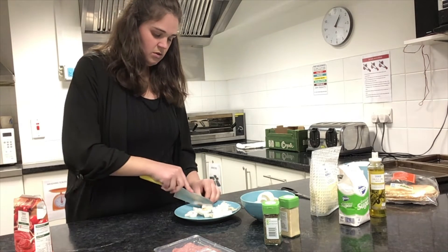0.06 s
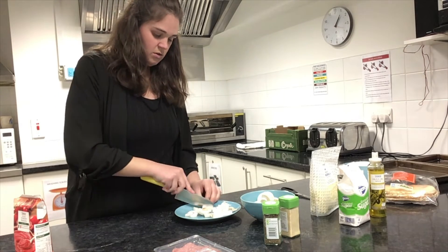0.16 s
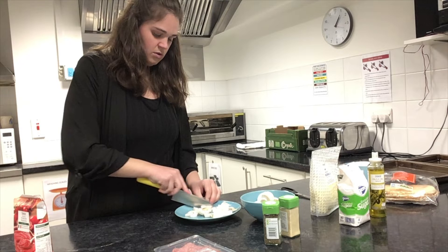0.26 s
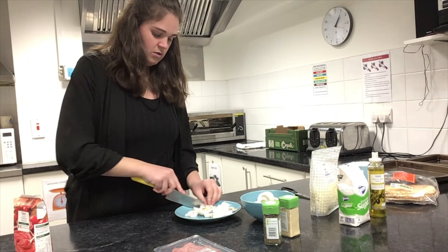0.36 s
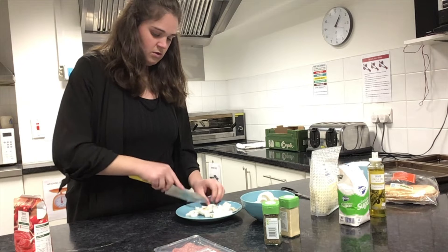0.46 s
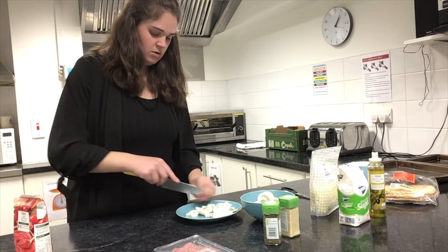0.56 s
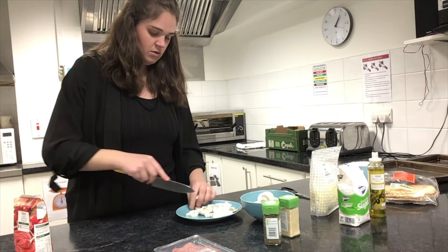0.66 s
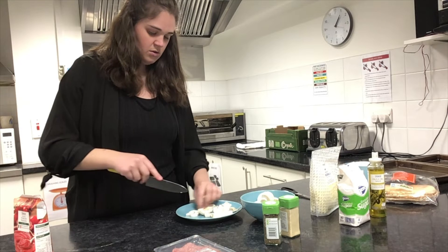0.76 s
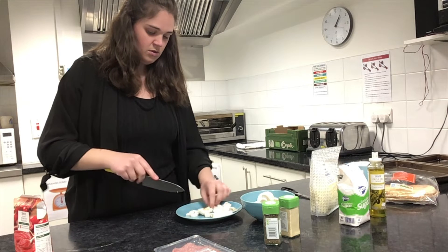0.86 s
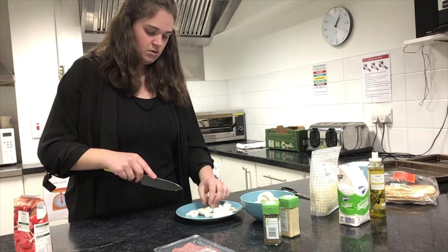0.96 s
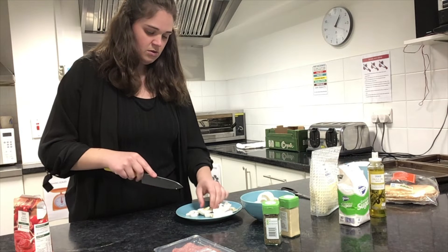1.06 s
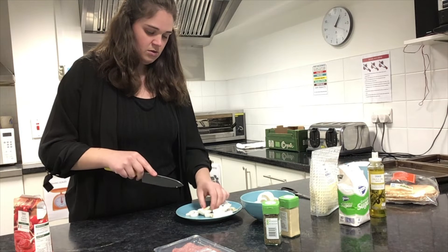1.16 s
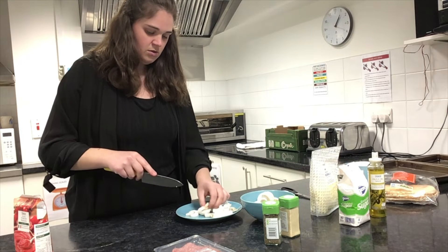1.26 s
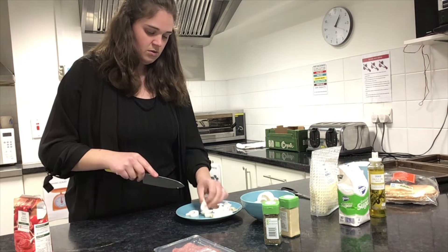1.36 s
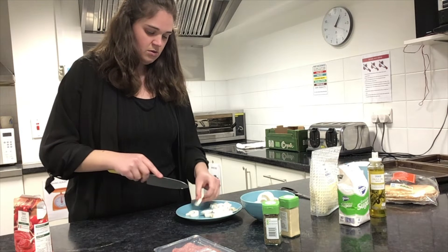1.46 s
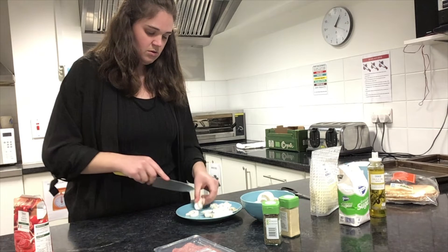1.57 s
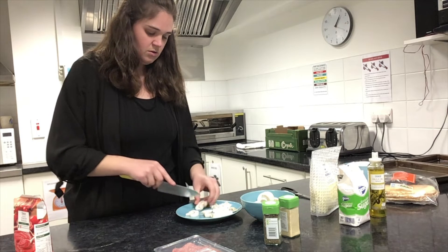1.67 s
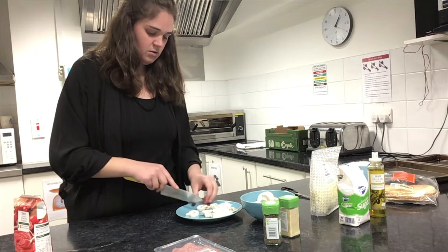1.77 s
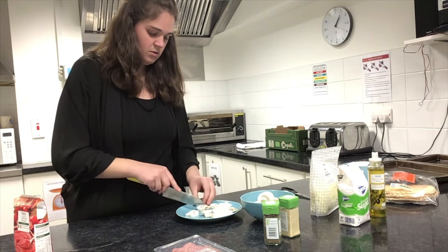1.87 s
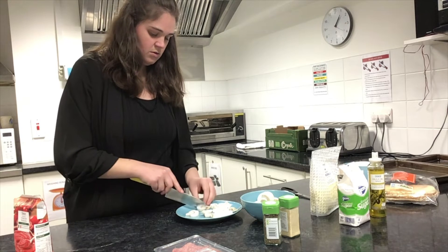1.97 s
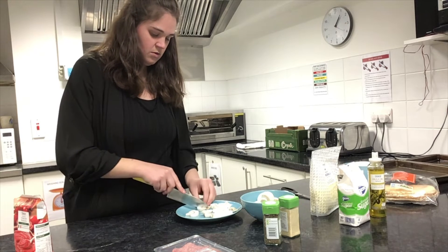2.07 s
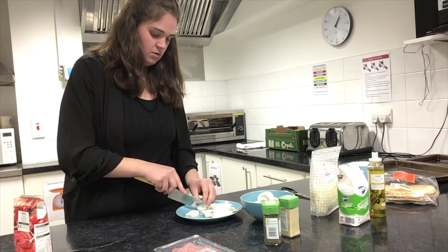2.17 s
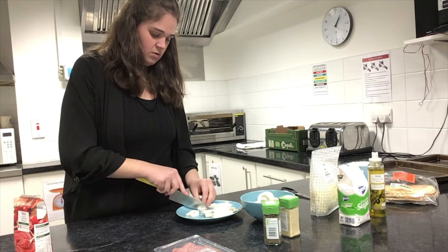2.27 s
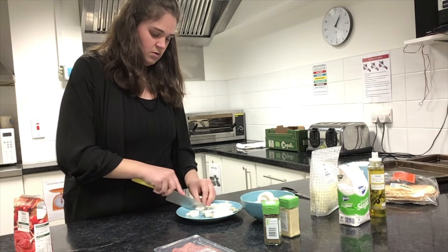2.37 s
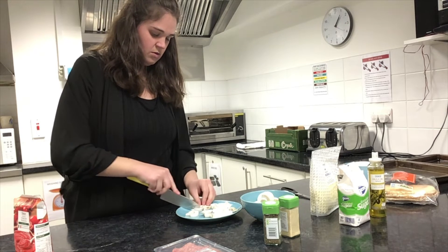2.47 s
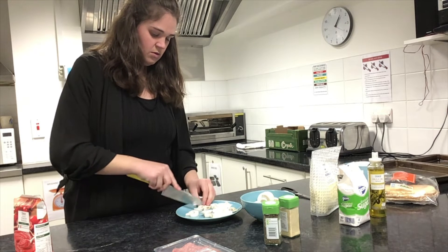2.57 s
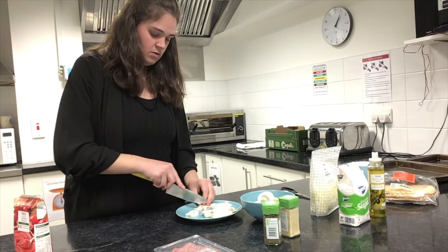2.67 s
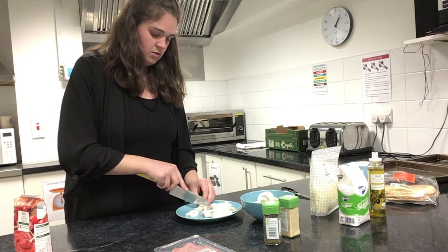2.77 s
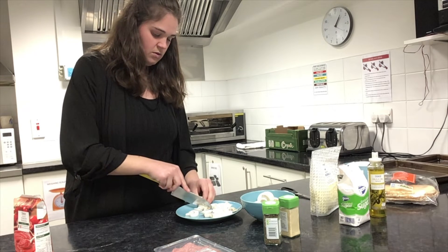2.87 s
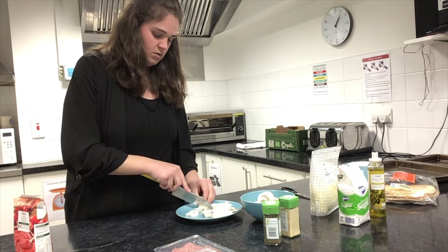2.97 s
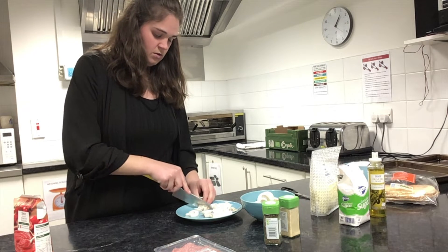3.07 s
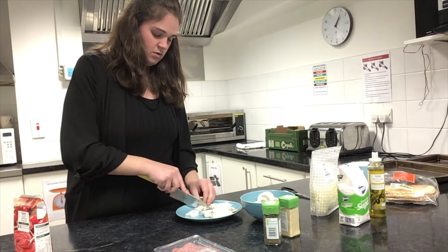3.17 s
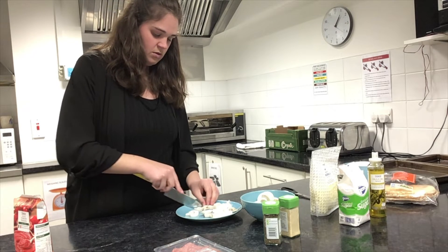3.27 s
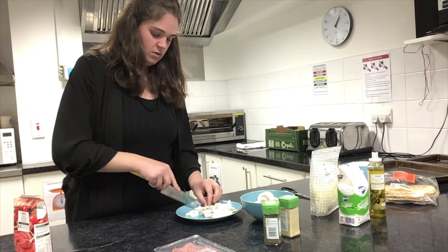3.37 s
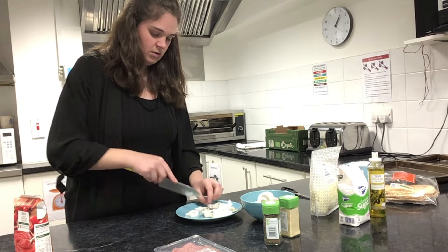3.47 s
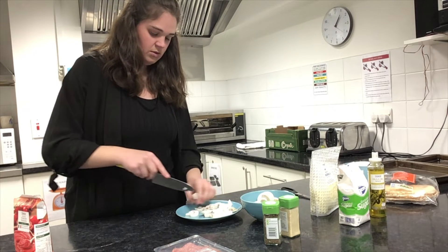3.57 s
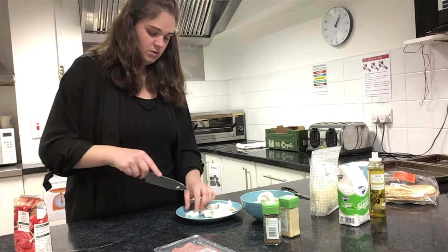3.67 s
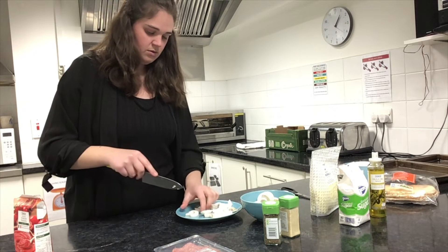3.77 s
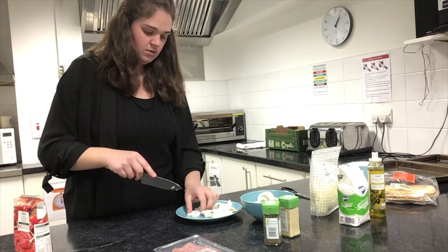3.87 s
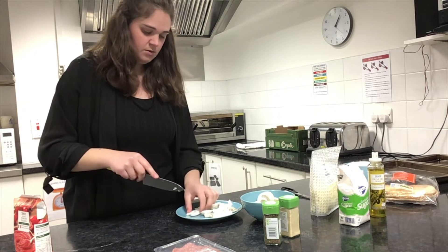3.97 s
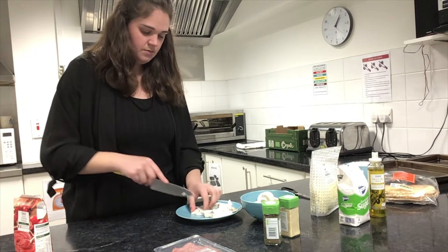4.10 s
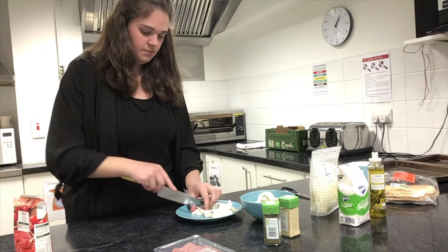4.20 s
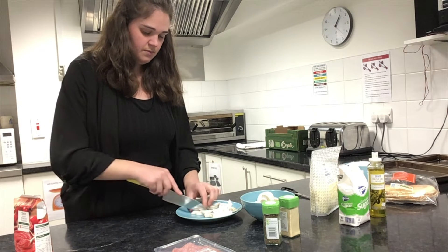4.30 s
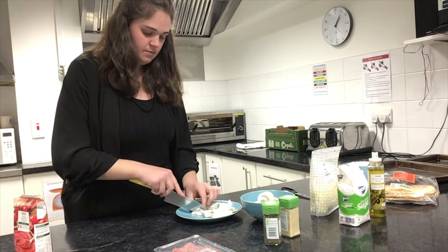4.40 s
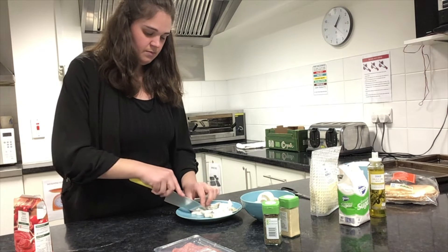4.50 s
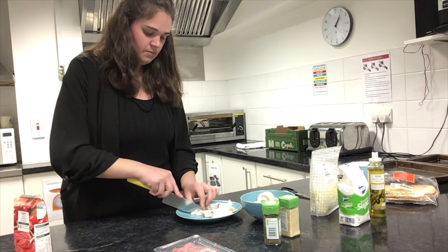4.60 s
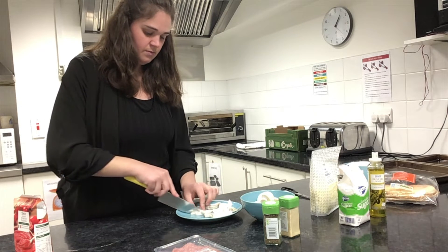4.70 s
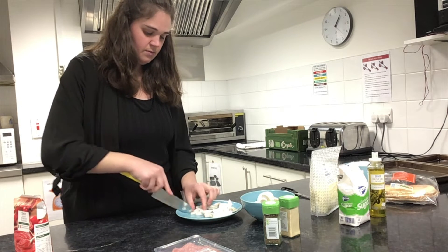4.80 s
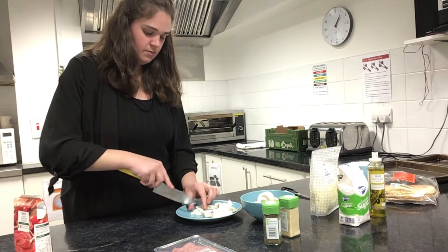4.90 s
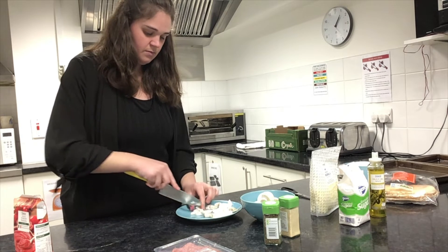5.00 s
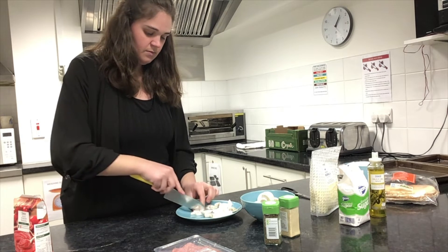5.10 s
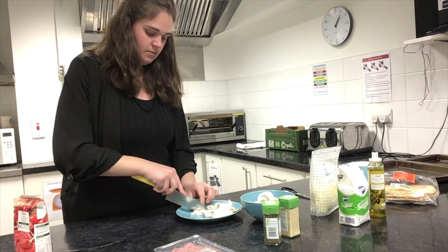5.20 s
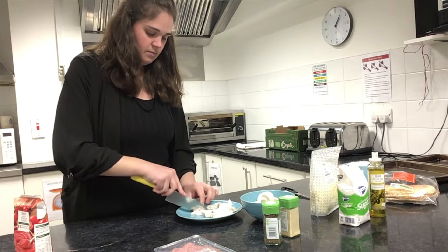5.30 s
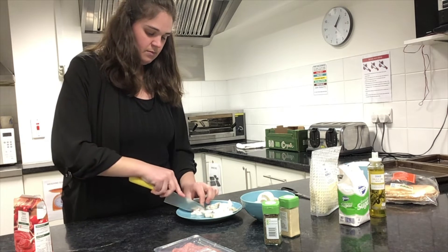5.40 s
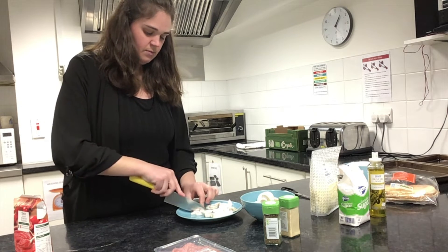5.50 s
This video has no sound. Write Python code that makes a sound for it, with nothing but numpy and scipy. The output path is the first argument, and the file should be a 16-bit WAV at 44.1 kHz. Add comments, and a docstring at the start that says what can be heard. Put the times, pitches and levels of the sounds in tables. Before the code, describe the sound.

A knife slices soft mushrooms and clacks sharply onto a ceramic plate five times, unevenly spaced, in a tiled kitchen with faint hum.

```python
"""A knife cuts through soft mushrooms and lands on a glazed plate on a stone counter, heard close, in mono.
Each landing is a chattering burst that rings damped plate modes, led in by a swelling hiss of noise.
The plate's foot knocks back, soft bursts rustle, the counter booms, and a tiled kitchen answers in taps.
A light brush rings faintly and wet flesh squeaks twice on the glaze, as a gliding harmonic stack.
Under it lie room air and microphone hiss as coloured noise, a low hum and wavering fridge tones."""
import sys
import numpy as np
from scipy import signal
from scipy.fft import rfft, irfft
from scipy.io import wavfile
from scipy.ndimage import uniform_filter1d

SR = 44100
rng = np.random.default_rng(int(sys.argv[2]) if len(sys.argv) > 2 else 0)


def to_wav(s):
    """Save 16-bit WAV."""
    ch = np.atleast_2d(s).T  # columns
    pcm = np.round(np.clip(ch, -1, 1) * 32767)  # PCM
    wavfile.write(sys.argv[1], SR, pcm.astype(np.int16))


def gain_from_db(level_db):
    """Turn a decibel level (scalar or array-like) into a linear amplitude factor."""
    decades = np.asarray(level_db, float) / 20
    return 10 ** decades


N = 244622

# modes of the plate: mode_hz, under_blade_db, in_knock_db, longest t60_s
PLATE = [(369, -20, -10.5, 0.1), (419, -13, -10.5, 0.11), (473.4, -9.5, -7, 0.079),
         (535, -14.5, -6.5, 0.031), (930, -12, -7, .025), (1010, -9, -4, .025), (1350, -10, -4, .025),
         (1679, -10.5, -10, 0.3), (1833, 1, -5, 0.032), (1992, -1, -4.5, 0.058), (2136, -1.5, -12.5, 0.037),
         (2453, -8.5, -23, 0.14), (2575, -12.5, -8.5, 0.57), (2784, -21.5, -7.5, 0.033),
         (3120, -15.5, -4, .1), (3287, 5, -10.5, 0.023), (3605, -10.5, -6.5, 0.15), (3900, -5, -4.5, 0.061),
         (4055, 0.5, -13.5, 0.031), (4300, -3.5, -20.5, 0.056), (4600, -17, -16, 0.39),
         (4850, -21.5, -6.5, 0.11), (4940, -20, -14, 0.055), (6044, -2, -15, 0.058), (6244, 0, -10, 0.084),
         (6600, -16, -13.5, 0.04), (7720, -11, -17, 0.13), (8540, -11, -27, 0.16), (9210, -18, -20.5, 0.2),
         (11080, -11.5, -31, 0.16), (12790, -27.5, -51, 0.1), (14200, -15, -30, 0.073)]


def evened(x):
    """Scales to rms 1."""
    return x / np.sqrt(np.mean(x ** 2) + 1e-20)


def read(points, hz):
    """Reads a table on a log-frequency axis."""
    f, value = np.transpose(points)
    return np.interp(np.log(hz + 1), np.log(f + 1), value)


def add(mix, s, sound):
    """Mixes a sound in at s seconds."""
    part = mix[round(s * SR):][:len(sound)]
    part += sound[:len(part)]


def noise(size, spectrum):
    """Noise of rms 1 with the given colour."""
    hz = np.fft.rfftfreq(size, 1 / SR)
    coloured = rfft(rng.standard_normal(size)) * gain_from_db(read(spectrum, hz))
    return evened(irfft(coloured, size))


def fuzzy_tone(hz, width):
    """A tone of rms 1 whose height and phase wander at the rate of its width in Hz."""
    r = np.exp(-np.pi * width / SR)
    # a second of run-in is dropped
    wander = signal.lfilter([1], [1, -2 * r, r * r], rng.standard_normal((2, N + SR)))[:, SR:]
    carrier = np.exp(2j * np.pi * hz * np.arange(N) / SR)
    return evened(np.real((wander[0] + 1j * wander[1]) * carrier))


def hold(t, length, edge):
    """Rises, holds and falls with soft edges."""
    return np.sin(np.pi / 2 * np.clip(np.minimum(t, length + edge - t) / edge, 0, 1)) ** 2


def causal_filter(spectrum, log_gain):
    """Applies a log gain to a spectrum with minimum phase, so that nothing sounds early."""
    return np.fft.ifft(spectrum * np.exp(np.conj(signal.hilbert(log_gain)))).real


def uncoloured(taps, smooth_hz):
    """Evens out the broad colour of a train of taps with a causal filter, keeping its timing."""
    spectrum = np.fft.fft(taps, 2 * len(taps))
    bins = round(smooth_hz * len(spectrum) / SR)
    power = uniform_filter1d(abs(spectrum) ** 2, bins, mode="wrap")
    return causal_filter(spectrum, -.5 * np.log(power))[:len(taps)]


def rattle(length, density, first):
    """One first impact, then sparse ones (density per s) that fall 30 dB over length seconds; evened."""
    t = np.arange(3000) / SR
    draw = rng.random((2, len(t)))
    taps = (draw[0] < density / SR) * (2 * draw[1] - 1) * gain_from_db(-30 * t / length)
    taps[0] = first
    return uncoloured(taps, 120)


def snap(size, spectrum, t60):
    """A dying burst of noise, evened out and then given its colour by a causal filter."""
    fall = gain_from_db(-60 * np.arange(size) / SR / t60)
    flat = np.fft.fft(uncoloured(rng.standard_normal(size) * fall, 250), 2 * size)
    log_gain = np.log(gain_from_db(read(spectrum, abs(np.fft.fftfreq(2 * size, 1 / SR)))))
    burst = causal_filter(flat, log_gain)[:size]
    return burst * np.linalg.norm(fall) / np.linalg.norm(burst)  # as strong as noise that starts at rms 1


def blow(row, mode_db, longest, rise, chatter, crack_db, crack_t60, favour_db, mid_db, top_db):
    """One contact: a burst of tiny impacts rings the plate modes, coloured by where it is struck."""
    # where the drive of a contact is set: hz
    colour_hz = [400, 1100, 2100, 4500, 11000]
    # broadband crack of the contact: hz, db_per_hz
    crack_colour = [(60, -62.5), (200, -16), (500, -15.5), (1200, -6), (2100, 4), (2800, -1.5), (4500, 2),
                    (6200, -7.5), (7000, -12), (14500, -30.5), (16500, -39.5)]
    # how the drive at 2100 Hz follows, and at 11000 Hz falls with, that at: 400 Hz, 1100 Hz (dB per dB)
    mid_shares = 0.73, 0.23
    top_shares = -.3, -0.76
    s, db, low, body, *favoured_hz = row
    mid = mid_db + np.dot(mid_shares, [low, body])
    top = top_db + np.dot(top_shares, [low, body])
    colour = np.transpose([colour_hz, [low, body, mid, 0, top]])

    def favour(f):
        return favour_db * sum(np.exp(-(np.log(f / centre) / 0.053) ** 2) for centre in favoured_hz)

    hz, t = np.array(PLATE)[:, :1], np.arange(9000) / SR
    near = np.exp(-(np.log(hz / favoured_hz) / .015) ** 2).max(1, keepdims=True)
    # blade, food and fingers damp the ring, the treble most, the favoured mode least
    damped_t60 = longest * (1 + 1.5 * near) * np.minimum(6500 / hz, 1)
    t60 = np.minimum(np.array(PLATE)[:, 3:], damped_t60)

    detune, split, height, phase = rng.standard_normal((4, len(PLATE), 1))
    hz = hz * (1 + .004 * detune)
    level = gain_from_db(mode_db[:, None] + read(colour, hz) + favour(hz) + 1.5 * height - 60 * t / t60)
    # each mode is a slightly split pair, which beats
    pair = np.sin(2 * np.pi * hz * t + phase) + np.sin(2 * np.pi * hz * (1 + .008 * split) * t)

    grid = np.geomspace(60, 20000, 200)
    shape = np.transpose([grid, read(crack_colour, grid) + read(colour, grid) + favour(grid)])
    crack = gain_from_db(crack_db) * snap(len(t), shape, crack_t60)
    one = ((level * pair).sum(0) + crack) * (1 - np.exp(-t / rise)) ** 2
    burst = signal.fftconvolve(one, chatter)
    return s, gain_from_db(db) * burst / np.sqrt(np.mean(burst[:SR // 100] ** 2))  # level over the first 10 ms


def background():
    """Room air and microphone hiss, with a low steady hum and fridge tones on top."""
    # low hum of a fan or compressor at 33.3 Hz and its harmonics, with a 50 Hz line: pitch_hz, level_db
    low_hum = [(33.3, -92.5), (50, -83), (66.6, -78), (100, -66)]
    # wavering fridge tones: pitch_hz, width_hz, level_db
    fridge_tones = [(136.3, 9.8, -73), (205, 29, -78), (238, 3.6, -78.5), (481, 30, -80.5), (602, 16, -85),
                    (892, 7.8, -81), (1290, 14, -85.5), (1340, 13, -94.5), (2684, 20, -87)]
    # colour of the air and hiss: hz, db_per_hz
    air_colour = [(15, -54.5), (30, -32), (60, -16.5), (150, -12.5), (340, -17.5), (570, -18), (790, -26),
                  (1060, -30), (2670, -33), (6000, -37.5), (9000, -44), (15200, -46), (16500, -48)]
    air_db = -66
    t = np.arange(N) / SR
    hum = 0
    for hz, db in low_hum:
        steady = np.sqrt(2) * np.sin(2 * np.pi * hz * t)
        hum = hum + gain_from_db(db) * (steady + 0.35 * fuzzy_tone(hz, 1.9))
    fridge = sum(gain_from_db(db) * fuzzy_tone(hz, width) for hz, width, db in fridge_tones)
    return gain_from_db(air_db) * noise(N, air_colour) + hum + fridge


def knife():
    """The blade hisses through the mushroom ever louder, then strikes the glaze and chatters."""
    # the blade lands: start_s, level_db, extra drive_400_hz_db, favoured_low_hz, favoured_high_hz
    cuts = [(0.1235, -20.5, -2.5, 1723, 4586), (2.237, -19.5, -5, 1798, 3605),
            (3.0906, -23.5, -3.5, 1920, 3379), (4.605, -18, -2, 2337, 4850),
            (5.4088, -18, -1.5, 2424, 5823)]
    # blade through the flesh: hz, db_per_hz
    slice_colour = [(180, -35.5), (300, 2.5), (574, 1.5), (1430, -7), (4680, -0.5), (12000, -22),
                    (15600, -53), (22000, -120)]
    body_db, body_share = -1, -0.96  # the deeper the thud, the less drive at 1100 Hz
    under_db, growth_db_per_s = -40, 452.5  # hiss at its end against the landing, and its growth
    out, t = np.zeros(N), np.arange(2400) / SR
    to_end = t[::-1]
    mode_db = np.array(PLATE)[:, 1]
    for s, db, low, *favoured_hz in cuts:
        row = s, db, low, body_db + body_share * low, *favoured_hz
        chatter = rattle(length=0.021, density=1200., first=1.3)
        landing = blow(row, mode_db, .045, 0.00035, chatter, crack_db=20.0, crack_t60=0.0092,
                       favour_db=6.5, mid_db=-2.5, top_db=3.0)
        add(out, *landing)
        hiss = noise(len(t), slice_colour) * gain_from_db(db + under_db - growth_db_per_s * to_end)
        add(out, s - t[-1] - .001, hiss)  # ends 1 ms before the landing
    return out


def kitchen(x, wet_db):
    """Sparse taps of random sign, each band dying at its own speed, denser energy in the first echoes."""
    # decay of the tiled room: hz, t60_s
    room_decay = [(150, 0.88), (500, 0.54), (1500, 0.3), (4000, 0.44), (8000, 0.36), (15000, 0.48)]
    seconds = np.arange(SR) / SR
    taps = np.zeros(SR)
    at = np.arange(130, SR - 20, 20)
    taps[at + rng.integers(0, 20, at.shape)] = rng.choice([-1., 1.], at.shape)
    taps *= 1 + 2.8 * gain_from_db(-60 * seconds / 0.081)
    # the colour is evened under a fade that is then undone
    fade = gain_from_db(-120 * seconds)
    taps = uncoloured(taps * fade, 40) / fade
    hz, t, z = signal.stft(taps, SR, nperseg=256)
    tail = signal.istft(z * gain_from_db(-60 * t / read(room_decay, hz)[:, None]), SR, nperseg=256)[1]
    return x + gain_from_db(wet_db) * signal.fftconvolve(x, tail / np.linalg.norm(tail))[:N]


def rocking():
    """The foot of the plate meets the counter more softly; denser, slower bursts give brief soft rustles."""
    # the tipped plate knocks on the counter:
    # start_s, level_db, extra drive_400_hz_db, drive_1100_hz_db, favoured_hz
    knocks = [(1.751, -61, 35.5, 27.5, 600), (2.4366, -32, -3.5, -2.5, 3900),
              (2.4894, -26, 7.5, 25.5, 1318), (2.4951, -29.5, -9, -3, 2575), (3.343, -41, -9.5, 4, 920),
              (3.384, -52.5, 8, -9, 243.3), (4.7915, -34, -1.5, -2, 350)]
    # brief soft rustles, the first and last of them just ahead of a landing,
    # the two between as blade or plate slides briefly: same columns
    rustles = [(.099, -78, -5, -6.5, 4300), (0.453, -63.5, 4.5, -4, 4600), (2.93, -75.5, -4, -5, 5400),
               (5.384, -60.5, -6, -14, 5150)]
    out, mode_db = np.zeros(N), np.array(PLATE)[:, 2]
    free, rubbed = .075, .025  # damping limit on the ring, t60 in s
    for row in knocks:
        chatter = rattle(length=0.021, density=900., first=0.76)
        knock = blow(row, mode_db, free, 0.00086, chatter, crack_db=8.0, crack_t60=0.019,
                     favour_db=3.0, mid_db=0.5, top_db=-4.5)
        add(out, *knock)
    for row in rustles:
        chatter = rattle(length=0.058, density=1000.0, first=.3)
        rustle = blow(row, mode_db, rubbed, 0.004, chatter, crack_db=11.0, crack_t60=0.0099,
                      favour_db=3.0, mid_db=-1.0, top_db=-4.0)
        add(out, *rustle)
    return out


def counter():
    """The cupboard under the slab booms slowly in two low modes."""
    # the counter thumps under the plate: start_s, drive_db, t60_s
    thumps = [(0.138, -63.5, 0.18), (2.25, -58.5, 0.17), (2.506, -36.5, 0.31), (3.39, -58, 0.17),
              (4.621, -49.5, 0.45), (5.421, -52, 0.38)]
    out, t = np.zeros(N), np.arange(12000) / SR
    boom = np.sin(2 * np.pi * 62 * t) + 1.7 * np.sin(2 * np.pi * 150 * t) * gain_from_db(-150 * t)
    slow_rise = (t / 0.033) ** 2 / (1 + (t / 0.028) ** 2)
    for s, db, t60 in thumps:
        add(out, s, boom * gain_from_db(db - 60 * t / t60) * slow_rise)
    return out


def brushing():
    """Two high plate modes are kept whispering by a light touch."""
    # a faint high ring as the plate is brushed: start_s, length_s, level_db of the lower mode
    touches = [(3.83, 0.069, -85.5), (3.93, 0.028, -81)]
    edge_s = .012
    t = np.arange(N) / SR
    level = sum(gain_from_db(db) * hold(t - s, length, edge_s) for s, length, db in touches)
    return level * (fuzzy_tone(6420, 60) + 0.43 * fuzzy_tone(9900, 60))


def squeaks():
    """Slips in quick, slightly uneven succession: a stack of harmonics that glides to its settled pitch."""
    # wet flesh on the glaze: start_s, length_s, level_db, first_hz (slips per s), settled_hz
    slips = [(5.181, 0.037, -57, 640, 451), (5.223, 0.052, -65.5, 446, 497)]
    # colour of the harmonics: hz, level_db
    squeak_colour = [(300, 7.5), (480, 4.5), (950, -2), (1400, -12), (1950, -1), (2350, -16.5), (2750, -9),
                     (3250, -6), (3800, -20), (8000, -35)]
    settle_s, edge_s = 0.0109, 0.003
    out, k = np.zeros(N), np.arange(1, 15)[:, None]
    for s, length, db, first_hz, settled_hz in slips:
        t = np.arange(0, length + edge_s, 1 / SR)
        hz = settled_hz + (first_hz - settled_hz) * np.exp(-t / settle_s)
        hz = hz * (1 + 0.49 * uniform_filter1d(rng.standard_normal(len(t)), size=80))
        harmonics = np.cos(2 * np.pi * k * np.cumsum(hz) / SR)
        stack = (gain_from_db(read(squeak_colour, k * hz)) * harmonics).sum(0)
        add(out, s, gain_from_db(db) * hold(t, length, edge_s) * evened(stack))
    return out


def scene():
    """Near sounds with their echoes over the background."""
    wet = kitchen(knife(), wet_db=-2.0) + kitchen(rocking() + squeaks(), wet_db=-4.0)
    return (wet + counter() + brushing() + background())[None]


def top_cut(x):
    """Nothing passes above the cut-off."""
    return signal.sosfilt(signal.butter(12, 16840, fs=SR, output="sos"), x)


def record(dry):
    """The finished mix is passed through top_cut()."""
    return top_cut(dry)


dry = scene()
out = record(dry)
to_wav(out)
```